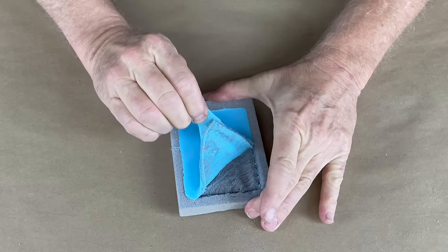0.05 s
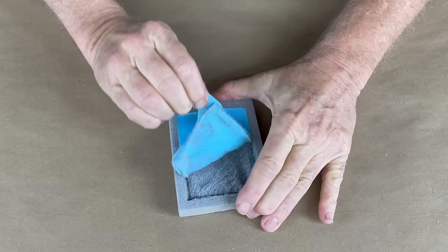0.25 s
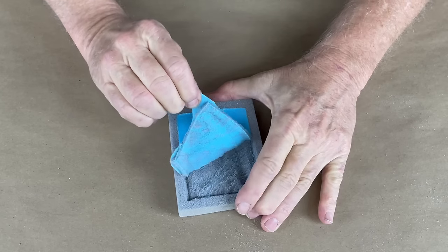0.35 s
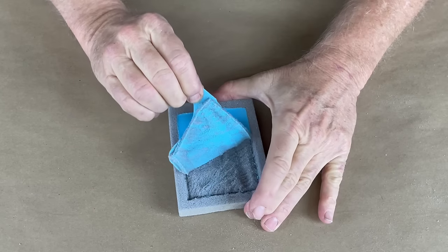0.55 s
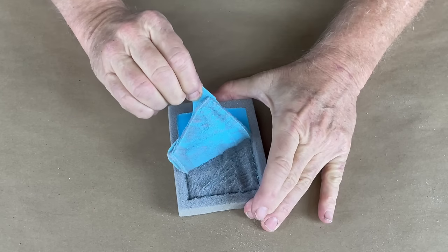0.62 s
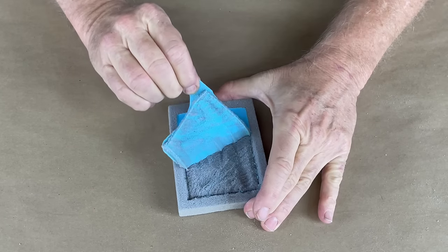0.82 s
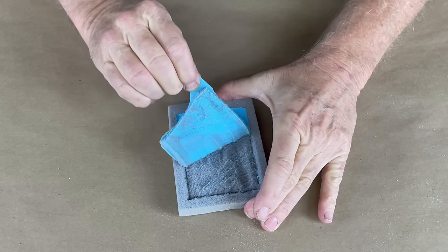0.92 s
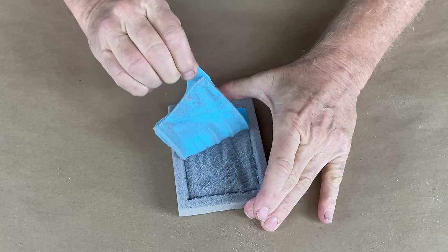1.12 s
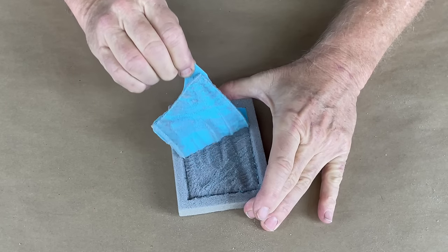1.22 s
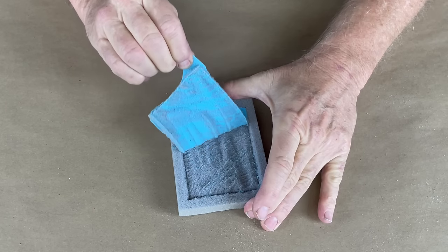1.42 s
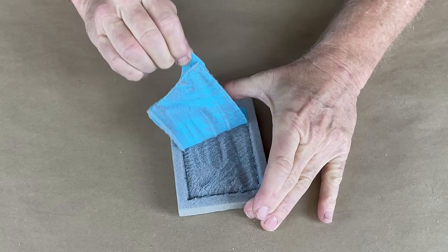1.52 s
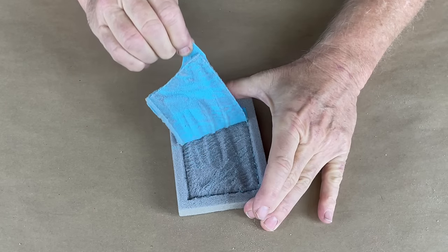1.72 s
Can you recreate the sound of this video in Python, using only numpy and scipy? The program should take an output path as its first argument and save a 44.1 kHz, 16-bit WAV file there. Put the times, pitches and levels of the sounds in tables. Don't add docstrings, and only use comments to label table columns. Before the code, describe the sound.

Brittle foam tears under peeling rubber, starting almost silent, bursting loudest early, easing, then crackling in denser clusters; soft creeping ticks and dull block bumps sit beneath, close microphone, quiet small room.

```python
import sys
import numpy as np
from scipy import signal
from scipy.fft import rfft, irfft
from scipy.io import wavfile

SR = 44100
rng = np.random.default_rng(int(sys.argv[2]) if len(sys.argv) > 2 else 0)


def log_audio(samples):
    frames = np.atleast_2d(samples).T
    limited = np.clip(frames, -1, 1)
    pcm = np.round(limited * 32767).astype(np.int16)
    wavfile.write(sys.argv[1], SR, pcm)


def gain_from_db(level_db):
    decades = np.asarray(level_db, float) / 20
    return 10 ** decades


N = 77175

# f/Hz, level per Hz/dB
HUSH_COLOUR = [(15, -10), (60, -3), (200, 1.5), (600, -8), (2000, -17.5), (8000, -45), (16000, -11.5)]
# t/s, creep level/dB
HAND_PULL = [(0, -50.5), (0.119, -51.5), (.185, -44), (.23, -44.5), (.36, -36.5), (.5, -54.5), (.72, -47),
             (.8, -34.5), (.92, -43), (1.05, -37.5), (1.09, -28), (1.16, -36.5), (1.28, -41.5), (1.36, -40),
             (1.52, -44.5), (1.6, -41), (1.65, -32.5), (1.75, -48)]
# start t/s, level/dB, length/ms, block ring relative to
# the snaps/dB
SEAM_TEARS = [(0.0028, -49, 5, -2.5), (0.0414, -40, 2.1, -1.5), (0.1412, -34.5, 2.3, -6.5),
              (0.1785, -39, 14.4, -34), (0.2348, -22.5, 1.6, -13), (0.2507, -19.5, 2.6, -18),
              (0.2822, -20, 5.2, -0.5), (0.2972, -9.5, 13, -7), (0.3214, -47, 19, -23),
              (0.3388, -28, 3.9, 1.5), (0.3854, -32, 3.2, 3), (0.4117, -32.5, 3.7, 5),
              (0.4297, -23, 1.8, -1), (0.4457, -22.5, 1.23, 2.5), (0.5084, -39, 2.3, -4),
              (0.5495, -31, 2.2, -25), (0.5619, -31.5, 2, -6.5), (0.6327, -41, 3.2, -12),
              (0.66, -37, 2.6, -1.5), (0.6856, -28.5, 2.2, -6),
              (0.7273, -27.5, 2.4, -1.5), (0.7337, -26, 5.3, -4.5), (0.7521, -32.5, 9.1, -6.5),
                (0.7752, -31, 4.5, -34), (0.7915, -21, 1.1, -5.5), (0.8103, -23.5, 2.5, 4),
                (0.8178, -25.5, 4.1, -1.5), (0.8272, -25.5, 1.8, 6), (0.8307, -31, 3.9, 0.5),
                (0.8689, -29, 5.1, 0), (0.8778, -34.5, 11, -4), (0.899, -30.5, 2.5, -10),
                (0.9337, -30.5, 2, -29), (0.9442, -32, 2.2, 1.5), (0.9493, -39, 9, -9),
                (0.9623, -32, 2.5, -5), (1.0181, -31.5, 3.1, -6), (1.0682, -16, 2.4, 0.5),
                (1.0857, -21.5, 0.9, -0.5), (1.094, -32, 2.5, -4), (1.102, -26.5, 6.5, -2.5),
                (1.1122, -36, 5.9, 6), (1.1403, -21.5, 9.7, -2.5), (1.1564, -31.5, 5.2, 2),
                (1.1879, -21.5, 1.3, -15), (1.1916, -28.5, 4.8, 1.5), (1.2068, -30, 3.4, -1),
                (1.2185, -26, 3.4, -28), (1.2248, -25.5, 1.9, 0),
              (1.2567, -24, 4.3, -9), (1.2876, -37, 2.7, -12), (1.301, -36, 8, 1.5),
               (1.3251, -29.5, 3, -8), (1.3434, -23.5, 4.2, -4), (1.3568, -23, 4.5, -9),
               (1.3607, -32.5, 5.2, 2), (1.3803, -18, 2.5, -6), (1.3937, -21, 1.5, -4),
               (1.4139, -29, 3.7, -33), (1.4199, -25.5, 1.7, -3), (1.4486, -16.5, 3.3, -8.5),
               (1.4693, -25, 2.1, -5.5), (1.4837, -35, 4.4, -8), (1.5469, -38, 8.1, -1),
               (1.5537, -30.5, 2.8, -9), (1.5666, -34.5, 6.7, -2.5), (1.5829, -38, 6.4, -1.5),
               (1.6168, -25.5, 4.5, -4), (1.6232, -27.5, 4.5, -1.5), (1.6329, -34, 5, -1),
               (1.6506, -20.5, 2.23, -2.5), (1.6576, -34, 7.7, -9), (1.6841, -41, 3.1, -19),
               (1.6972, -29, 9.7, -6.5), (1.7095, -34, 15, -0.5), (1.7238, -33, 4, 1),
               (1.7393, -25.5, 2.1, -4.5),
              (0.166, -45, 10, -30), (0.2417, -25.5, 6.5, -5), (0.2445, -18, 2.5, -30),
                 (0.2472, -16, 6.8, -6.5), (0.294, -18, 8.9, -15), (0.3065, -19, 2.6, 5.5),
                 (0.795, -26.5, 3.4, 2.5), (0.8, -37, 5.6, -1), (0.837, -36, 2.6, -1), (1.062, -22, 6, -11),
                 (1.079, -30.5, 3.6, -2), (1.136, -19.5, 6.2, -4), (1.145, -28, 8.8, -1.5),
                 (1.3422, -27, 2.6, -1), (1.353, -25.5, 4.7, -7), (0.304, -12.5, 3.7, -2),
                 (0.328, -29, 6, -14), (1.044, -29.5, 1.9, -7), (1.166, -31.5, 2.4, -4),
                 (1.43, -35, 2.7, -1), (1.503, -45, 4.3, 0)]
# f/Hz, level per Hz/dB
SNAP_COLOUR = [(300, -54), (2000, -16.5), (5000, -8.5), (7000, -2), (9000, -1.5), (11000, -13),
               (14000, -15), (16000, -18)]
# f/Hz, width/Hz, level/dB
BLOCK_RESONANCES = [(367, 197, -17), (710, 340, -17), (1280, 180, -6.5), (2250, 1200, 1.5),
                    (3360, 330, -5.5), (4620, 130, -6.5), (5100, 900, -8.5)]
# t/s, peak level/dB, f/Hz
HOLLOW_POPS = [(0.1416, -43, 2210), (0.2414, -36, 3250), (0.2502, -15.5, 1344), (0.2831, -17.5, 1260),
               (0.3017, -13, 2065), (0.3401, -24.5, 1280), (0.4116, -38, 3600), (0.4449, -33.5, 3490),
               (0.6597, -41.5, 1690), (0.6863, -40.5, 1620), (0.7342, -28, 1620), (0.7754, -36, 2980),
               (0.7943, -32, 2890), (0.8704, -26, 2910), (1.045, -36, 3260), (1.066, -24.5, 2370),
               (1.1155, -35, 1340), (1.1407, -16, 2270), (1.1917, -34, 2290), (1.225, -25, 2440),
               (1.2564, -29, 2580), (1.3029, -38.5, 2220), (1.3263, -33, 2240), (1.3404, -31, 1900),
               (1.3812, -34, 3300), (1.4482, -29.5, 3010), (1.4696, -35, 3180), (1.5465, -42, 2250),
               (1.5673, -49, 2110), (1.6177, -24, 2420), (1.6506, -32, 2360), (1.6841, -36, 2150),
               (1.697, -34, 1900), (1.717, -30, 1830),
               (0.236, -34, 1210), (.306, -17.5, 3424), (.313, -19, 2690), (0.7335, -35, 1120),
               (.81, -26.5, 1294), (.831, -30.5, 1140), (.871, -27, 1540), (1.085, -29, 2460),
               (1.103, -36, 2190), (1.151, -40, 1230), (1.159, -25.5, 3120), (1.219, -28, 2090),
               (1.226, -26, 3440), (1.357, -31, 2500), (1.618, -37.5, 525), (1.617, -27, 1480),
               (1.619, -29.5, 4230), (1.652, -31, 1310)]
# t/s, peak level/dB, f/Hz
TABLE_KNOCKS = [(0.296, -26.5, 762), (0.303, -22, 748), (0.338, -40, 750), (0.792, -45, 750),
                (0.818, -40, 431), (0.867, -49.5, 435), (1.016, -55, 444), (1.066, -52, 650),
                (1.083, -38, 410), (1.1, -43, 574), (1.139, -42, 667), (1.186, -39, 780), (1.34, -40, 614),
                (1.355, -40, 797), (1.379, -40.5, 457), (1.447, -46, 600), (1.616, -37, 596)]
# t/s, level/dB
TABLE_SHOVES = [
    (.3, -55.5),
    (.335, -57.5),
    (.4, -65),
    (.72, -74),
    (.82, -67),
    (1.09, -61.5),
    (1.14, -61),
    (1.2, -68),
    (1.37, -60),
]

HUSH_DB = -72.5
SNAPS_PER_S, SNAP_SCATTER_DB = 24000, 1
FLUTTER_DB, FLUTTER_PER_S = 1.8, 600
PATCH_DB, PATCH_PER_S = 3.5, 110
CREEP_TICKS_PER_S, CREEP_TICK_DB, CREEP_TICK_MS = 320, 8, 2.0
CREEP_BED_DB, CREEP_BLOCK_DB = -2.5, -11
ATTACK_MS, RELEASE_MS, SHORTEN_MS = .5, 0.75, 1.59
LINGER_DB, LINGER_MS = -8, 6.3
BLOCK_DB, BLOCK_SCATTER_DB = -4.5, 1.5
POP_DB, POP_MS = -3.5, 1.0
KNOCK_DB, KNOCK_MS = -4, 2.02
PITCH_WOBBLE = .025
THUMP_HZ, THUMP_WIDTH_HZ, THUMP_MS = 266, 380, 17.5
DEEP_DB = -14
RUB_S, RUB_SPREAD_S, RUB_HZ, RUB_WIDTH_HZ, RUB_DB = .47, .05, 800, 300, -56
LOW_CUT_HZ, TOP_HZ = 250, 15650
ROOM_DB, ROOM_DELAY_S = -14, 0.0032
ROOM_T60_LOW_S, ROOM_T60_HIGH_S, ROOM_SPLIT_HZ, ROOM_HIGH_DB = 0.66, 0.41, 4100, 2.5
PORT_HZ, PORT_WIDTH_HZ, PORT_DB = 7890, 480, 9


def unit(x):
    return x / np.sqrt(np.mean(x ** 2))


def band(x, hz, width_hz):
    return signal.lfilter(*signal.iirpeak(min(hz, .45 * SR), hz / max(width_hz, 10), fs=SR), x)


def colour(x, points):
    hz, db = np.array(points, float).T
    size = 2048
    f = np.maximum(np.arange(size // 2 + 1) * SR / size, 1)
    log_gain = np.interp(np.log(f), np.log(hz), db) * np.log(10) / 20
    cepstrum = irfft(log_gain)
    cepstrum[1:size // 2] *= 2
    cepstrum[size // 2 + 1:] = 0
    response = irfft(np.exp(rfft(cepstrum)))
    return signal.fftconvolve(x, response)[:N]


def walk(rate):
    a = np.exp(-2 * np.pi * rate / SR)
    drift = unit(signal.lfilter([1], [1, -2 * a, a * a], rng.standard_normal(N)))
    return 2 * np.tanh(drift / 2)


def room_hush():
    return gain_from_db(HUSH_DB) * unit(colour(rng.standard_normal(N), HUSH_COLOUR))


def creep():
    s, db = np.array(HAND_PULL).T
    pull = gain_from_db(2 * np.interp(np.arange(N) / SR, s, db))
    hit, size = rng.random((2, N))
    ticks = (hit < CREEP_TICKS_PER_S / SR) * gain_from_db(2 * CREEP_TICK_DB * size ** 2)
    ticks = signal.lfilter([1], [1, -np.exp(-2000 / CREEP_TICK_MS / SR)], ticks)
    return pull * (gain_from_db(2 * CREEP_BED_DB) + ticks / ticks.mean() / 2)


def tears():
    rows = np.array(SEAM_TEARS)
    share = gain_from_db(BLOCK_SCATTER_DB * rng.standard_normal((len(rows), len(BLOCK_RESONANCES))))
    power = np.zeros((len(BLOCK_RESONANCES) + 1, N))
    for (start, db, length, block_db), mix in zip(rows, share):
        first = max(int((start - .01) * SR), 0)
        last = min(int((start + .08) * SR), N)
        i = np.arange(first, last)
        ms = (i / SR - start) * 1000 - SHORTEN_MS / 2
        late = np.maximum(ms - max(length - SHORTEN_MS, 0), 0)
        rise = np.exp(2 * np.minimum(ms, 0) / ATTACK_MS)
        fall = np.exp(-2 * late / RELEASE_MS) + gain_from_db(2 * LINGER_DB) * np.exp(-2 * late / LINGER_MS)
        gains = np.append(1, gain_from_db(block_db + BLOCK_DB) * mix)
        power[:, i] += gains[:, None] ** 2 * gain_from_db(2 * db) * rise * fall
    return power


def swarm():
    hit, sign, size = rng.random((3, N))
    strength = gain_from_db(-SNAP_SCATTER_DB * np.log(1 - size))
    snaps = (hit < SNAPS_PER_S / SR) * np.sign(sign - .5) * strength
    return unit(snaps * gain_from_db(FLUTTER_DB * walk(FLUTTER_PER_S)))


def patchy(x):
    out, edges = 0, np.linspace(0, SR / 2, num=15)
    spectrum, f = rfft(x), np.arange(N // 2 + 1) * SR / N
    for lo, hi in zip(edges, edges[1:]):
        part = irfft(spectrum * ((f >= lo) & (f < hi)), N)
        out = out + gain_from_db(PATCH_DB * walk(PATCH_PER_S)) * part
    return unit(out)


def direct_snaps(power):
    snaps = patchy(swarm())
    return colour(snaps * np.sqrt(power), SNAP_COLOUR) / np.std(colour(snaps, SNAP_COLOUR)) / 2


def block_ringing(tear_power, seam):
    out = 0
    for (hz, width, db), power in zip(BLOCK_RESONANCES, tear_power):
        inside = swarm() * gain_from_db(PATCH_DB * walk(PATCH_PER_S))
        ring = band(inside * np.sqrt(power + gain_from_db(2 * CREEP_BLOCK_DB) * seam), hz, width)
        out = out + gain_from_db(db - 3) * ring * np.sqrt(SR / 10 / width)
    return out


def rings(rows, extra_db, rise_ms):
    out, s = np.zeros(N + SR), np.arange(SR // 20) / SR
    age = s * 1000 / rise_ms
    shape = age * np.exp(1 - age)
    for (start, db, hz), (turn, glide) in zip(rows, rng.standard_normal((len(rows), 2))):
        pitch_drift = 1 + PITCH_WOBBLE * glide * (age / 2 - 1)
        phase = 2 * np.pi * (turn + hz * s * pitch_drift)
        i = int(start * SR)
        out[i:i + len(s)] += gain_from_db(db + extra_db) * shape * np.sin(phase)
    return out[:N]


def pops():
    return rings(np.array(HOLLOW_POPS), POP_DB, POP_MS)


def knocks():
    return rings(TABLE_KNOCKS, KNOCK_DB, KNOCK_MS)


def shoves():
    start, db = np.array(TABLE_SHOVES).T
    age = (np.arange(N) / SR - start[:, None]) * 1000 / THUMP_MS
    puffs = gain_from_db(db) @ np.exp(-.5 * age ** 2)
    noise = rng.standard_normal(N)
    body = band(band(noise, THUMP_HZ, THUMP_WIDTH_HZ), 2 * THUMP_HZ, 2 * THUMP_WIDTH_HZ)
    deep = signal.lfilter(*signal.butter(2, THUMP_HZ / 2, fs=SR), noise)
    return puffs * (unit(body) + gain_from_db(DEEP_DB) * unit(deep))


def finger_rub():
    t = np.arange(N) / SR
    rub = band(rng.standard_normal(N), RUB_HZ, RUB_WIDTH_HZ)
    rub = unit(band(rub, RUB_HZ, 2 * RUB_WIDTH_HZ))
    return gain_from_db(RUB_DB) * rub * np.exp(-.5 * ((t - RUB_S) / RUB_SPREAD_S) ** 2)


def peeling():
    tear_power, seam = tears(), creep()
    foam = direct_snaps(tear_power[0] + seam) + block_ringing(tear_power[1:], seam)
    foam = foam + pops() + knocks() + finger_rub()
    foam = signal.lfilter(*signal.butter(3, LOW_CUT_HZ, "high", fs=SR), foam)
    return foam + shoves()


def room(x):
    t = np.arange(SR) / SR
    noise = rng.standard_normal(SR)
    low = signal.lfilter(*signal.butter(1, ROOM_SPLIT_HZ, fs=SR), noise)
    high = gain_from_db(ROOM_HIGH_DB) * (noise - low)
    onset = np.clip(t / ROOM_DELAY_S - 1, 0, 1)
    low_fade = np.exp(-np.log(1000) * t / ROOM_T60_LOW_S)
    high_fade = np.exp(-np.log(1000) * t / ROOM_T60_HIGH_S)
    tail = onset * (low * low_fade + high * high_fade)
    tail = gain_from_db(ROOM_DB) * tail / np.sqrt(np.sum(tail ** 2))
    return x + signal.fftconvolve(x, tail)[:N]


def scene():
    hush = room_hush()
    return (room(peeling()) + hush)[None]


def band_limit(x):
    return signal.sosfilt(signal.butter(12, 16340, fs=SR, output="sos"), x)


def record(dry):
    mix = dry + (gain_from_db(PORT_DB) - 1) * band(dry, PORT_HZ, PORT_WIDTH_HZ)
    mix = signal.sosfilt(signal.ellip(10, .2, 60, TOP_HZ, fs=SR, output="sos"), mix)
    return band_limit(mix)


dry = scene()
out = record(dry)
log_audio(out)
```